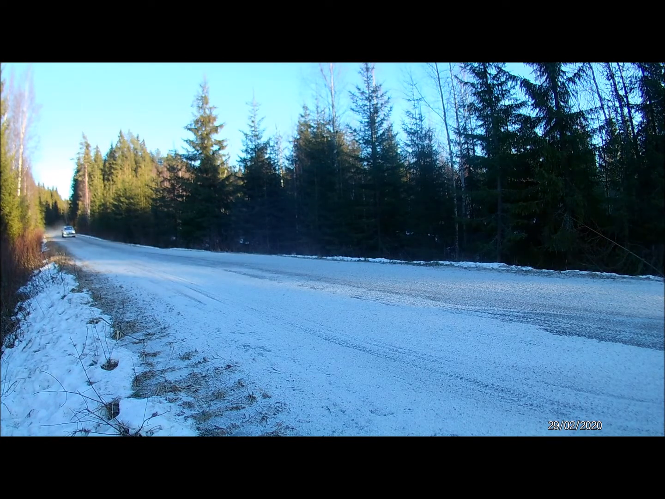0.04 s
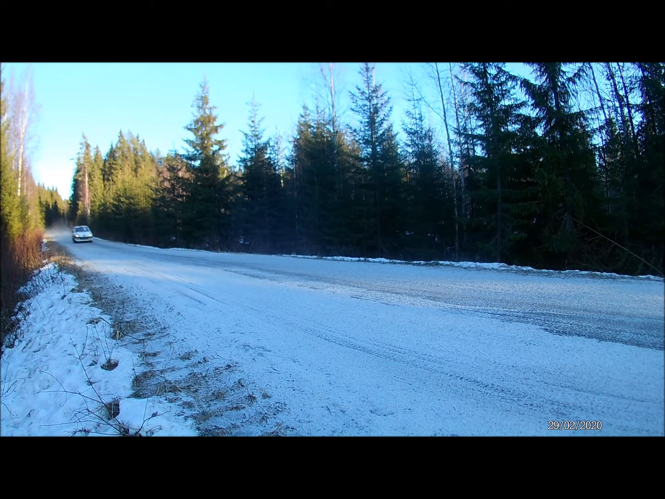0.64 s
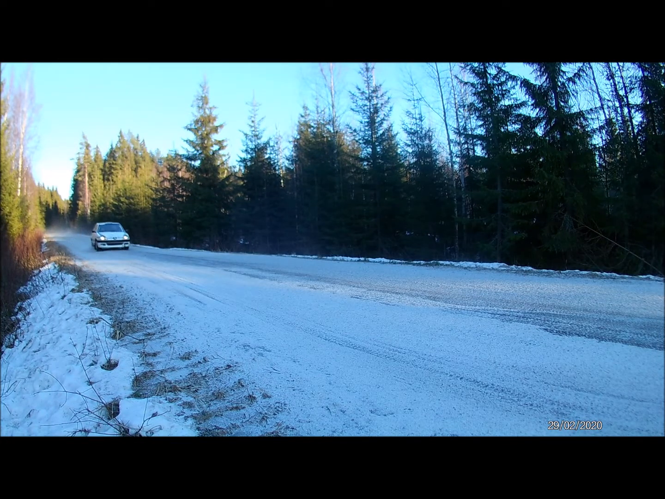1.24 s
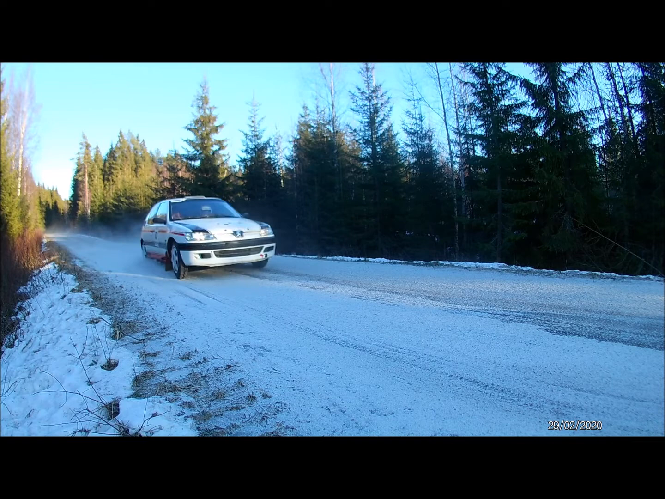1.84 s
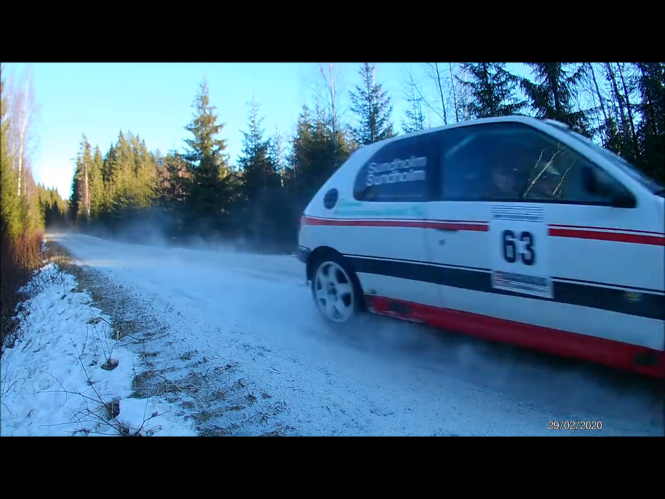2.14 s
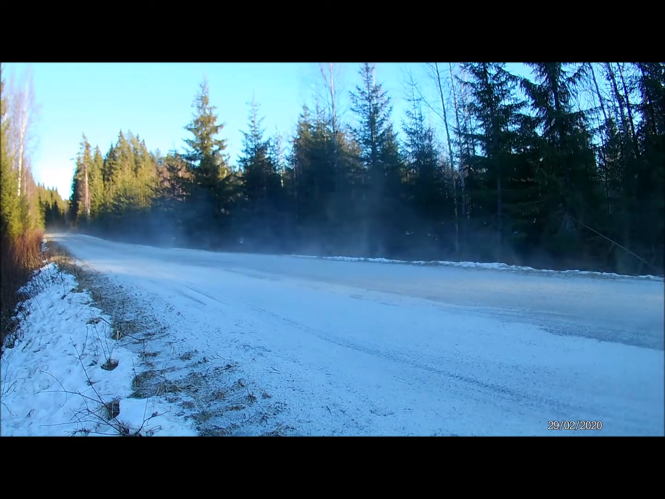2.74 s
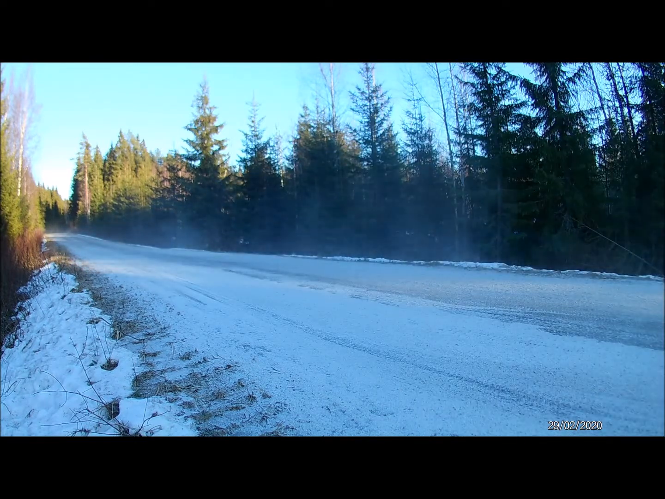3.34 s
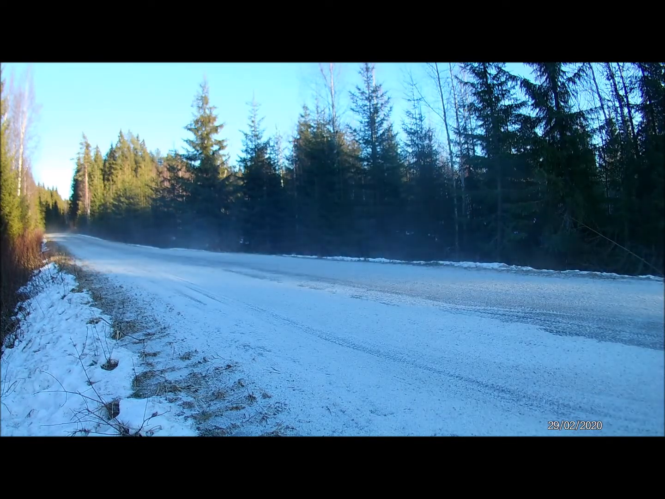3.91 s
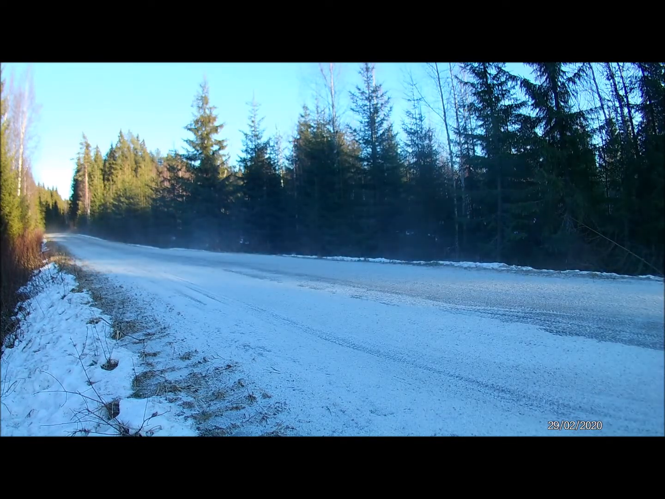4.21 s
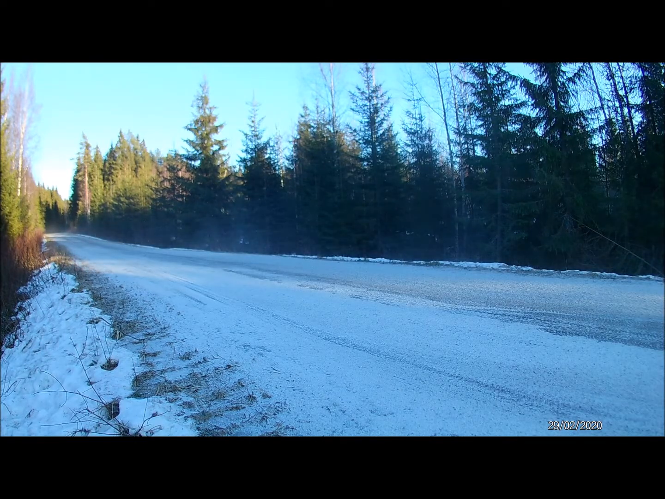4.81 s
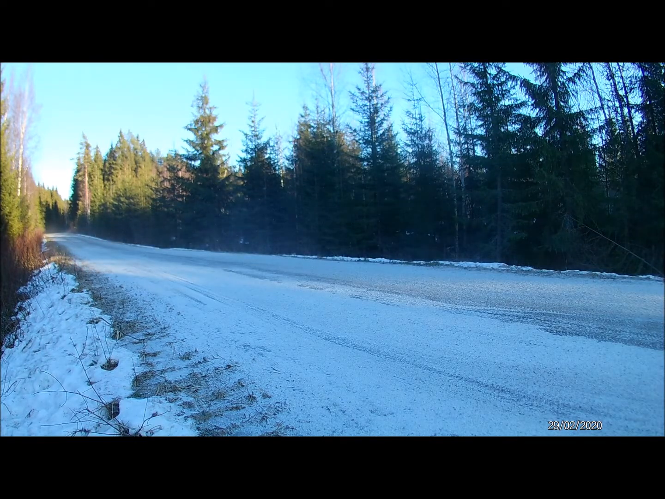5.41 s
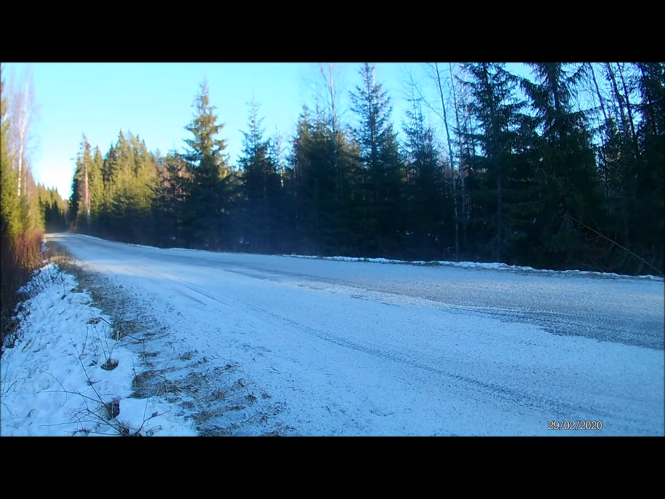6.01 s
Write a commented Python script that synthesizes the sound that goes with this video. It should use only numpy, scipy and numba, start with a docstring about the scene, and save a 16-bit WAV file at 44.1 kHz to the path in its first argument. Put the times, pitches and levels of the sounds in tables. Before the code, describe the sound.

Studded tyres crunch louder and louder on snow as a rally car comes in, its engine blipping and dropping in pitch. A little after two seconds it rushes past the roadside microphone with a low rumble, a spray of snow and a sharp, rasping exhaust. The engine stays on the throttle, its note wavering and slowly climbing as it dies away into the surrounding forest.

```python
"""Snowy forest road, a camera's microphone on the verge; its housing colours everything.
A four-cylinder rally car comes in from 46 m: tyre roar and blips of growl from air gulped by the intake.
At 2.3 s it passes 3.5 m from the microphone, wheels drumming in the ruts and flinging snow and grit.
Then the tailpipe faces back and its pressure pulses bark at full throttle, with a thin echo from the
trees, until the car reaches a bend 77 m down the road."""
import sys
import numpy as np
from scipy import signal
from scipy.fft import rfft, irfft
from scipy.io import wavfile
from numba import njit

SR = 44100
rng = np.random.default_rng(int(sys.argv[2]) if len(sys.argv) > 2 else 0)


def persist_wave(psi):
    """Save psi, clipped to +-1, as 16-bit WAV."""
    counts = np.round(np.clip(psi, -1, 1) * 32767).astype(np.int16)
    wavfile.write(sys.argv[1], SR, np.atleast_2d(counts).T)


N = 271215
TIME = np.arange(N) / SR
FREQ = np.maximum(np.fft.rfftfreq(2 * N, 1 / SR), 1)

# spectra of the microphone's own noise and of each source: f/Hz, level/dB
FLOOR_SPECTRUM = [(20,0.5),(60,-2.5),(150,-8.5),(500,-10),(1500,-25),(4000,-35.5),(11000,-40),(15500,-35.5)]
SPRAY_SPECTRUM = [(1000,-21.5),(3000,3),(4500,-3),(6400,-4),(8500,-19.5),(9800,-20),(11000,-17.5),(13000,-45.5),(14500,-33.5),(16000,-47)]
TYRE_SPECTRUM = [(30,-38),(100,-4),(250,-3),(450,-3.5),(620,-3.5),(850,-0.5),(1100,2.5),(1550,-0.5),(1950,-7.5),(2300,-17),(3000,-24),(4500,-32.5),(7000,-50),(12000,-78)]
INTAKE_SPECTRUM = [(50,-32),(90,-19),(140,-8),(190,4.5),(260,13),(350,1.5),(520,-3),(640,-21),(1300,-14.5),(3000,-45),(8000,-66)]
PIPE_SPECTRUM = [(40,-41.5),(90,-3),(160,7),(320,10.5),(480,8),(640,6.5),(880,-3.5),(1100,-3),(1330,-8),(1650,-10),(2100,-11.5),(2600,-11.5),(3600,-36),(4900,-35),(6500,-53),(11000,-60.5)]
# resonances and notches of the housing around the microphone: f/Hz, half width/Hz, gain/dB
HOUSING_BANDS = [(1292.4,70,8.5),(1435,16,-8),(1874,149,7.5),(2325,75,-4),(2390,22,6),(3365,182,11),(4067,264,8.5),(4680,110,-9),(4720,89,9.5),(6820,410,4),(7934,260,-18)]
# spurts of snow from the front, then the rear wheels: t/s, half length/s, level/dB
SNOW_SPURTS = [(2.175, 0.1, -48), (2.417, 0.086, -49.5)]
# the band that soft snow cancels, sinking as the path flattens: t/s, f/Hz, depth/0-1
SNOW_DIP = [(2.4, 865, 0.8), (2.75, 836, 0), (3.4, 420.8, .05), (3.85, 344.6, 0.73), (4.42, 337.3, 1),
            (4.85, 212, 0.91), (5.35, 199, 0.34)]
# firing rate as heard from the verge: t/s, f/Hz
FIRING_RATE = [(0.0, 242.9), (0.08, 250.8), (0.22, 241.3), (0.31, 216.5), (0.38, 212.8), (0.49, 185),
               (0.74, 187.9), (0.75, 182.9), (0.86, 182), (0.99, 213), (1.03, 214.2), (1.2, 168.6),
               (1.34, 158.2), (1.4, 142.6), (1.63, 136.1), (1.69, 172.3), (1.76, 179.5), (1.8, 178.6),
               (1.88, 148.5), (2.0, 136.2), (2.11, 164.4), (2.38, 152.7), (2.64, 163.8), (3.2, 145.3),
               (3.42, 161.4), (3.67, 163.6), (3.85, 186.2), (3.92, 180.2), (4.01, 187.9), (4.08, 179.4),
               (4.16, 188.1), (4.42, 197.4), (4.54, 183), (4.74, 199), (4.83, 190.5), (5.0, 200),
               (5.33, 187.1), (5.5, 200), (5.74, 206.2), (5.81, 190.7), (5.91, 197.1), (6.15, 162)]
# presses of the throttle: down/s, up/s, opening/0-1
THROTTLE_PRESSES = [(.04, 0.19, 0.67), (.83, 1.032, 0.83), (1.61, 1.815, 1), (1.98, 5.72, 1),
                    (6.04, 6.1, 0.95)]
# each cylinder's gulp of air, in firing order: level/dB
CYLINDER_GULPS = [-0.5, -0.5, 1, -8]
# every second firing is weak and late, more so at high revs:
# firing rate/Hz, weakening/dB, lag/firing periods, once-a-revolution throb/dB
UNEVEN_FIRING = [(150, 3, 0.022, -43), (159.5, 1.5, 0.029, -38), (183, 3, 0.049, -28.5),
                 (220, 6.5, 0.056, -29.5)]
# the tailpipe's beam swings on and off the microphone as the car slides away: t/s, gain/dB
PIPE_AIM = [(2.55, 1.5), (2.8, -0.7), (3.02, -6), (3.65, -9), (3.9, -4), (4.47, -2.95), (4.72, -8.5),
            (5.2, -13), (5.7, -11)]
# the pipe's bright spot slides up as its mouth turns: t/s, f/Hz
BRIGHT_SPOT = [(2.35, 1680), (2.42, 1816), (2.47, 2120), (2.56, 2360)]
# the exhaust's registers, low to high: level/dB, change from in front/dB, change off throttle/dB,
# multiple of the beam's swing, place on the road where it comes into view/m
BOOM_REGISTER = (-19, -0.95, -7, 0.19, -4)
BARK_REGISTER = (-16.5, -12, -17.5, 0.73, 1.67)
RASP_REGISTER = (-20.5, -29, -16, 0.97, -0.72)
SIZZLE_REGISTER = (-31, -17, -14.5, 1.44, 1)

PASS_S, SPEED_M_S, NEAREST_M = 2.282, 20.2, 3.52  # the car at its closest to the microphone
NOSE_M, TURN_M = -2.92, 0.99  # where the nose turns away; how gradually the sides come into view


def undb(db):
    """Decibels to gain."""
    return 10 ** (np.asarray(db) / 20)


def unit(x):
    """Scale to rms 1."""
    return x / np.sqrt(np.mean(x ** 2))


def curve(rows):
    """The columns of a table, joined by straight lines in time."""
    times, *columns = np.transpose(rows)
    return np.squeeze([np.interp(TIME, times, column) for column in columns])


def shape(x, db):
    """Causal filter with the given gain at each frequency."""
    cepstrum = irfft(db * np.log(10) / 20)
    cepstrum[1:N] *= 2
    cepstrum[N + 1:] = 0
    return irfft(rfft(x, 2 * N) * np.exp(rfft(cepstrum)))[:N]


def colour(x, spectrum):
    """Filter x by a spectrum table, to rms 1."""
    hz, db = np.transpose(spectrum)
    return unit(shape(x, np.interp(np.log(FREQ), np.log(hz), db)))


def split(x, hz, order):
    """The parts of x below and above a frequency."""
    low = irfft(rfft(x, 2 * N) / (1 + (FREQ / hz) ** order))[:N]
    return low, x - low


@njit
def band(x, hz, width):
    """Band-pass with a moving centre; width is relative to the centre."""
    y = np.empty(len(x))
    band_state, low_state = 0., 0.
    for i in range(len(x)):
        g = np.tan(np.pi * hz[i] / SR)
        passed = (band_state + g * (x[i] - low_state)) / (1 + g * (g + width))
        band_state = 2 * passed - band_state
        low_state += 2 * g * passed
        y[i] = width * passed
    return y


def noise():
    """White noise."""
    return rng.standard_normal(N)


def wander(rate_hz):
    """Random drift below a rate, at rms 1."""
    return unit(split(noise(), rate_hz, order=4)[0])


def swell(at_s, span_s):
    """A bell-shaped rise to 1 and back."""
    return np.exp(-((TIME - at_s) / span_s) ** 2)


def along():
    """The car's place on the road in metres, negative while it approaches."""
    return SPEED_M_S * (TIME - PASS_S)


def distance():
    """Metres from the car to the microphone."""
    return np.hypot(along(), NEAREST_M)


def spread_db():
    """Level change with distance, 0 at the closest point."""
    return 20 * np.log10(NEAREST_M / distance())


def past(place_m, width_m=TURN_M):
    """Rises from 0 to 1 as the car passes a place on the road."""
    return .5 + .5 * np.tanh((along() - place_m) / (2 * width_m))


def forest_echo(x, echo_db=-25, growth=.87, t60_s=0.95, build_s=.012):
    """Trunks and branches scatter the short waves into a blur, whose share grows with distance."""
    tail = noise() * undb(-60 * TIME / t60_s) * (1 - np.exp(-TIME / build_s))
    tail /= np.sqrt(np.sum(tail ** 2))
    tail = split(tail, hz=5000, order=4)[0]
    tail = split(tail, hz=900, order=1)[1]  # the deep note slips between the trees
    return signal.fftconvolve(x * undb(echo_db - growth * spread_db()), tail)[:N]


def ice_grains(peak_db=-66):
    """A shower of ice crystals tinkles just behind the rear wheels."""
    hz = np.full(N, 10900.)
    grains = noise() * undb(5 * wander(400))
    return unit(band(band(grains, hz, .2), hz, .2)) * undb(peak_db) * swell(2.51, .06)


def snow_spray(level_db=-52, front_db=-8, falloff=1.174, grit_db=4):
    """Flung snow hisses, fading faster than 1 / distance, and spurts as the wheels pass."""
    hiss = colour(noise() * undb(grit_db * wander(250)), SPRAY_SPECTRUM)
    steady = undb(level_db + front_db * (1 - past(NOSE_M)) + falloff * spread_db())
    spurts = sum(undb(db) * swell(at_s, span_s) for at_s, span_s, db in SNOW_SPURTS)
    return hiss * (steady + spurts)


def wheel_rumble(peak_db=-32):
    """Ruts drum through the wheels and body shell, heard only close to the microphone."""
    hz = np.full(N, 250.)
    return unit(band(band(noise(), hz, 0.82), hz, 0.82)) * undb(peak_db) * swell(2.323, 0.28)


def tyre_roar(level_db=-27, behind_db=2.1, snow_db_per_m=-0.0931, bend_db=-8.5, grit_db=-1, rut_db=1.7):
    """Studs and grit crunch in a dense roar that shakes with the ruts."""
    hidden = 1 - past(-46.7, width_m=7) + past(77, width_m=7)  # behind trees at a bend either way
    path_db = spread_db() + snow_db_per_m * distance() + bend_db * hidden
    roar = colour(noise() * undb(grit_db * wander(450)), TYRE_SPECTRUM)
    return roar * undb(level_db + path_db + behind_db * past(NOSE_M) + rut_db * wander(8.6))


def lifted(open_s=0.086, shut_s=.065):
    """1 with the throttle shut, 0 with it wide open."""
    return 1 - sum(opening * np.clip(np.minimum((TIME - down) / open_s, 1 - (TIME - up) / shut_s), 0, 1)
                   for down, up, opening in THROTTLE_PRESSES)


def firings(cycles, strength_db, lag, scatter_db, jitter_s):
    """One click per firing cycle, each a little off in strength and time."""
    chance = rng.standard_normal((2048, 2))
    firing = np.arange(1, int(cycles[-1]))
    middle = np.searchsorted(cycles, firing + .5)
    onset = np.interp(firing + lag[middle], cycles, np.arange(N)) + jitter_s * SR * chance[firing, 0]
    size = undb(strength_db[middle] + scatter_db * chance[firing, 1])
    taps = np.floor(onset).astype(int)[:, None] + np.arange(-7, 9)
    offset = taps - onset[:, None]
    click = np.sinc(offset) * np.cos(np.pi * offset / 16) ** 2  # can land between samples
    return unit(np.bincount(np.clip(taps, 0, N - 1).ravel(), (size[:, None] * click).ravel(), N))


def intake(cycles, level_db=-21.5, shut_db=-28.5, behind_db=-32, hiss_db=-30):
    """Uneven gulps of air growl in the airbox and hiss past the throttle."""
    gulp_db = np.array(CYLINDER_GULPS)[cycles.astype(int) % len(CYLINDER_GULPS)]
    gulps = firings(cycles, gulp_db, lag=np.zeros(N), scatter_db=.7, jitter_s=.00004)
    hiss = unit(split(colour(noise(), SPRAY_SPECTRUM), 4200, order=6)[1])
    gain = undb(level_db + spread_db() + shut_db * lifted() + behind_db * past(NOSE_M))
    return (colour(gulps, INTAKE_SPECTRUM) + undb(hiss_db) * hiss) * gain


def over_snow(x):
    """The reflection from the snow hollows out one band at the microphone."""
    hz, depth = curve(SNOW_DIP)
    return x - depth * band(x, hz, .75)


def pipe_ring(x, bright_db=5, edge_db=19, edge_hz=4150.):
    """The pipe's narrow resonances carry only while its mouth is close to the microphone."""
    bright = undb(bright_db) * swell(2.44, .12) * band(x, curve(BRIGHT_SPOT), .22)
    edge = undb(edge_db) * swell(2.44, .13) * band(x, np.full(N, edge_hz), .035)
    return x + bright + edge


def carried(level_db, front_db, shut_db, swing, view_m):
    """Gain of one exhaust register, from distance, the body's shadow, throttle and the pipe's aim."""
    shadow_db = front_db * (1 - past(view_m))
    return undb(level_db + spread_db() + shadow_db + shut_db * lifted() + swing * curve(PIPE_AIM))


def silencer_boom(boom, firing_hz, resonance_hz=128, skirt_hz=44.6, flutter_db=1.5):
    """The boom weakens as the revs climb above the silencer's resonance, far more so from in front."""
    db_per_hz = -0.0512 - 0.2326 * (1 - past(BOOM_REGISTER[-1]))
    detuned_db = db_per_hz * np.minimum(firing_hz - resonance_hz, skirt_hz)
    snow_db = -6 * past(39.5, width_m=4)  # far down the road the snow soaks it up
    return unit(boom) * carried(*BOOM_REGISTER) * undb(detuned_db + snow_db + flutter_db * wander(7))


def exhaust_treble(high, cycles, flare_db=4, flutter_db=1.5):
    """The pulses' sharp edges rasp and sizzle, each with a puff of turbulent gas."""
    rasp, sizzle = split(high, 1884, order=12)
    puffs = colour(np.exp(-(cycles % 1)) * noise(), PIPE_SPECTRUM)
    gas = split(puffs, 1200, order=6)[1]
    gas_rasp, gas_sizzle = split(gas, 2460, order=12)
    gas_db = -21 - .4 * spread_db()  # against the clean pulses, growing with distance
    rasp = unit(rasp) + undb(gas_db) * unit(gas_rasp)
    rasp *= undb(flare_db * swell(2.39, 0.049))  # the mouth points straight at the microphone
    sizzle = unit(sizzle) + undb(gas_db + 8) * unit(gas_sizzle)
    treble = rasp * carried(*RASP_REGISTER) + sizzle * carried(*SIZZLE_REGISTER)
    return treble * undb(flutter_db * wander(8.2))


def exhaust(cycles, firing_hz):
    """Sharp pressure pulses leave the pipe; the shorter the waves, the more tightly it beams them."""
    rates, *columns = np.transpose(UNEVEN_FIRING)
    weak_db, lag, throb_db = (np.interp(firing_hz, rates, column) for column in columns)
    second = np.floor(cycles) % 2
    pair_db = 10 * np.log10((1 + undb(-2 * weak_db)) / 2)  # taken off so each pair keeps its power
    pulses = firings(cycles, -weak_db * second - pair_db, lag * second, scatter_db=.5, jitter_s=.000015)
    low, high = split(-colour(pulses, PIPE_SPECTRUM), 885, order=8)
    boom, bark = split(low, 264, order=12)
    treble = exhaust_treble(high, cycles)
    throb = unit(-np.cos(np.pi * cycles))
    throb *= carried(throb_db, front_db=-11.5, shut_db=-6.5, swing=0, view_m=3.2)
    return throb + silencer_boom(boom, firing_hz) + unit(bark) * carried(*BARK_REGISTER) + treble


def scene():
    """The pass from the verge; the revs waver a little as the tyres grip and slip."""
    slip = .002 + .0015 * past(22, width_m=4)
    firing_hz = curve(FIRING_RATE) * (1 + slip * wander(25))
    cycles = np.cumsum(firing_hz) / SR
    engine = over_snow(pipe_ring(exhaust(cycles, firing_hz))) + intake(cycles)
    return (engine + forest_echo(engine) + tyre_roar() + snow_spray() + wheel_rumble() + ice_grains())[None]


def record(dry, ceiling=0.74, treble_db=-3, floor_db=-61.5, top_hz=15800):
    """The microphone rounds the peaks and adds faint rumble and hiss; its housing rings and notches."""
    rounded = ceiling * np.tanh(dry[0] / ceiling)
    housing_db = sum(db * np.exp(-((FREQ - hz) / width) ** 2 / 2) for hz, width, db in HOUSING_BANDS)
    shelf_db = treble_db * FREQ ** 2 / (FREQ ** 2 + 900 ** 2)
    heard = shape(rounded, housing_db + shelf_db) + undb(floor_db) * colour(noise(), FLOOR_SPECTRUM)
    return signal.sosfilt(signal.ellip(10, .2, 80, top_hz, fs=SR, output="sos"), heard)[None]


dry = scene()
out = record(dry)
persist_wave(out)
```